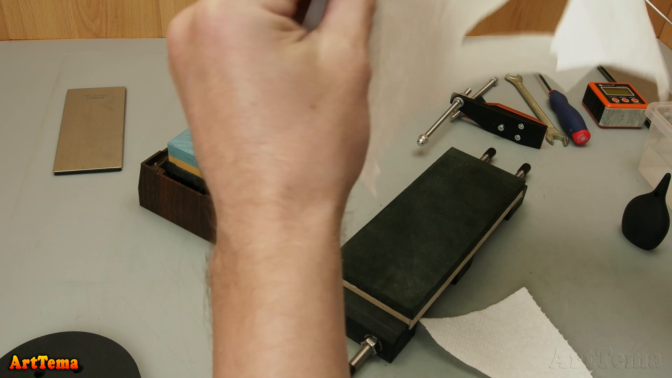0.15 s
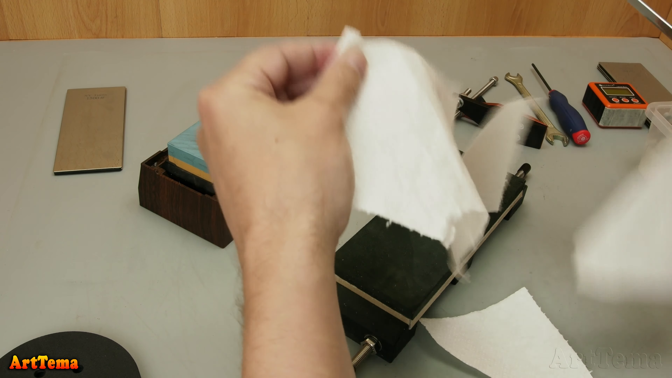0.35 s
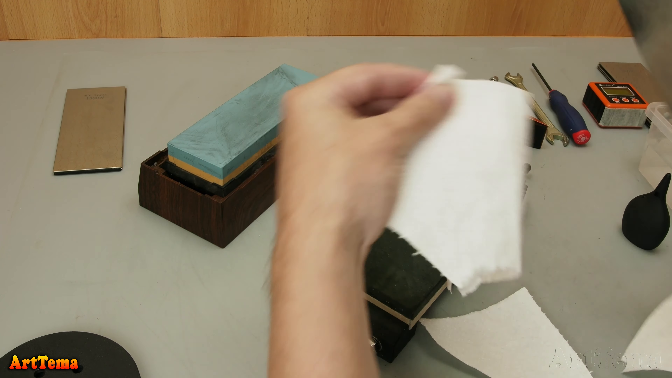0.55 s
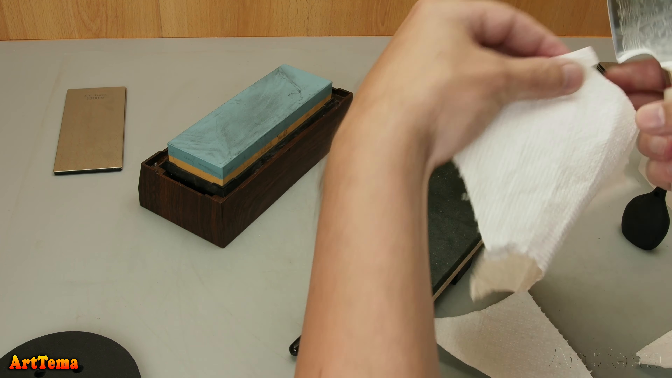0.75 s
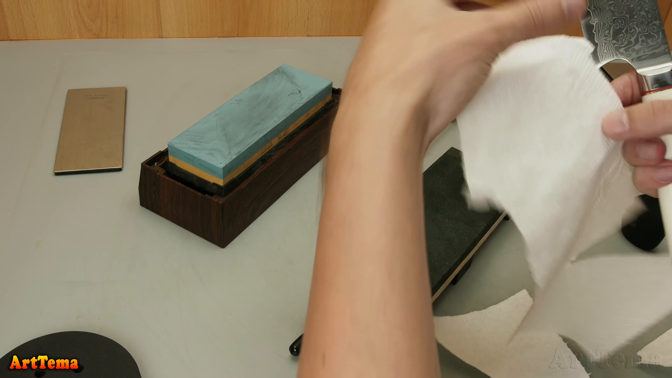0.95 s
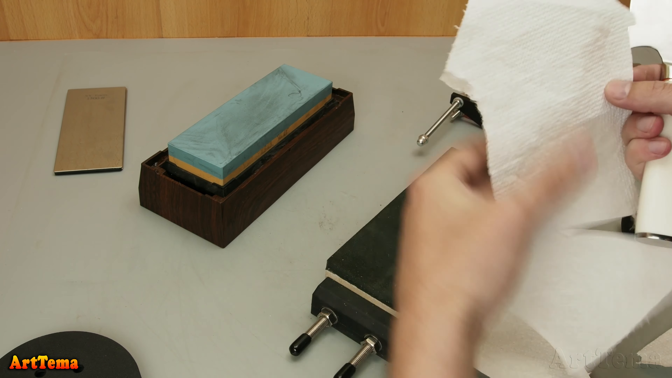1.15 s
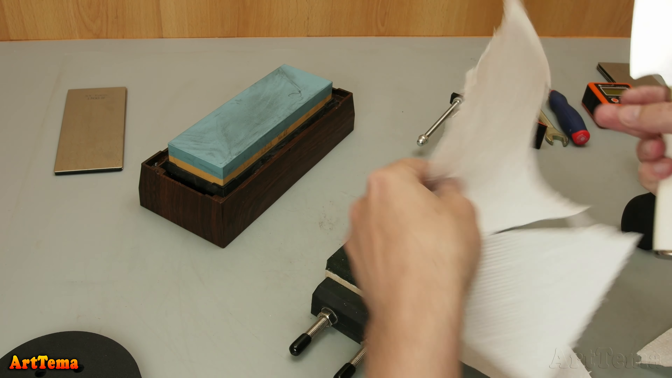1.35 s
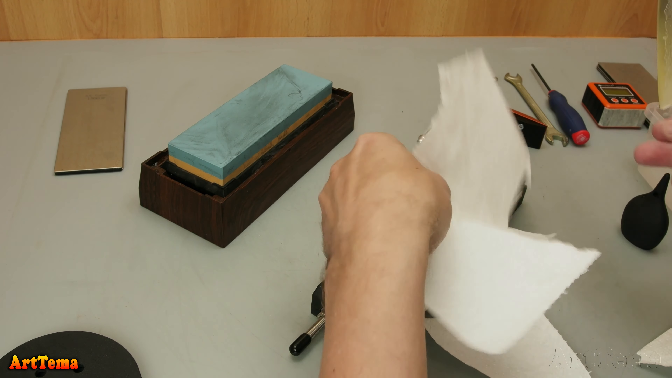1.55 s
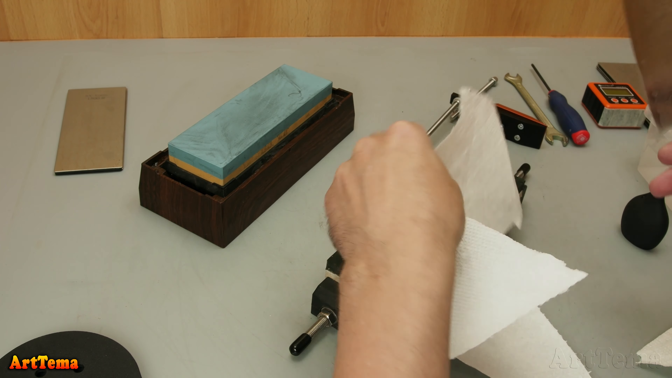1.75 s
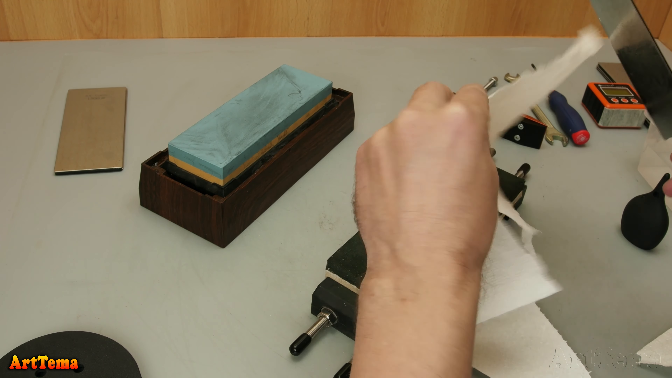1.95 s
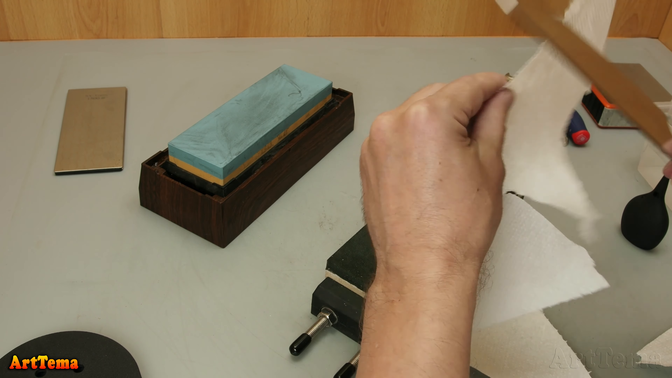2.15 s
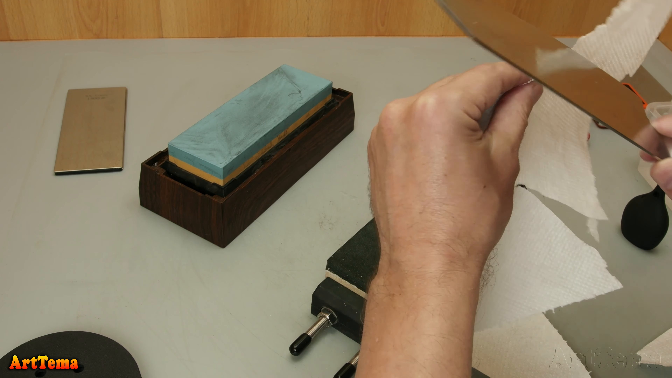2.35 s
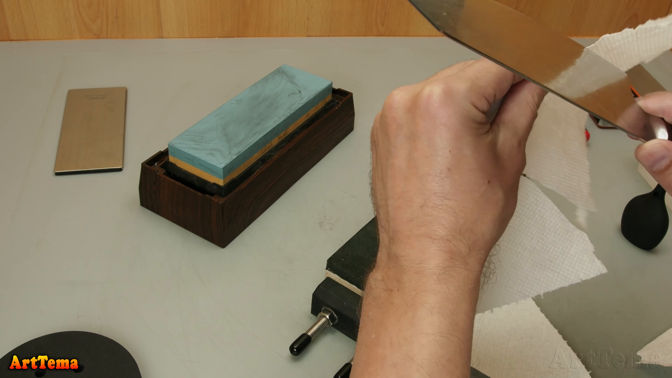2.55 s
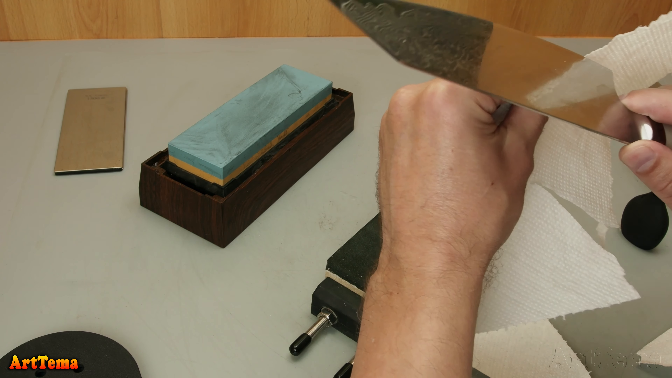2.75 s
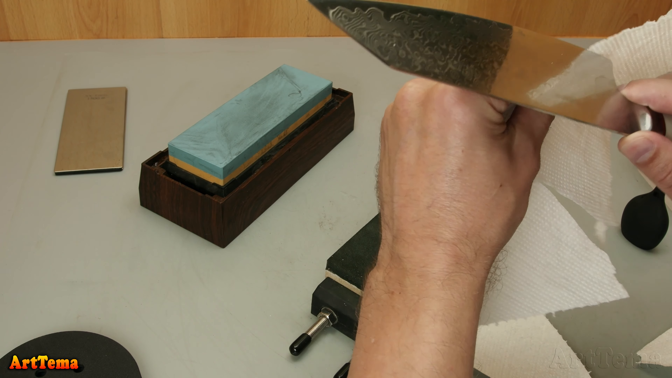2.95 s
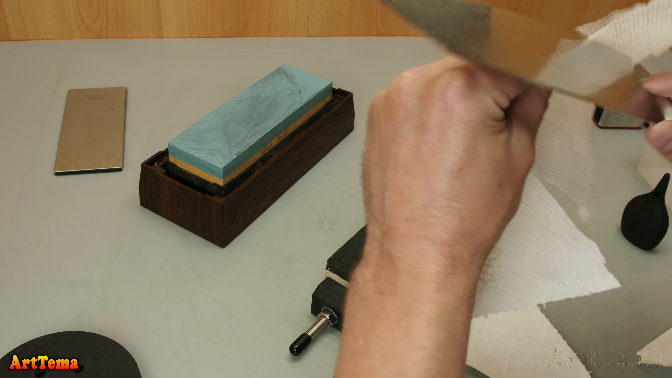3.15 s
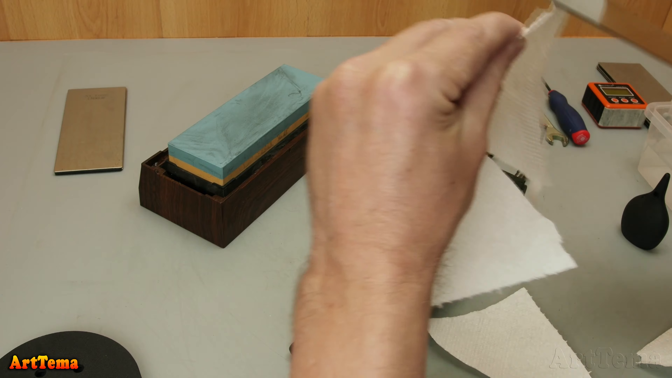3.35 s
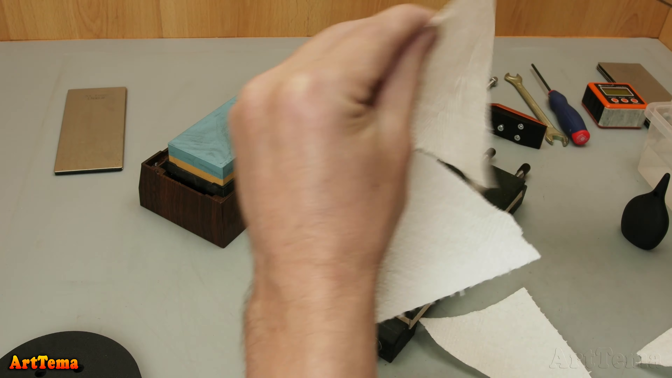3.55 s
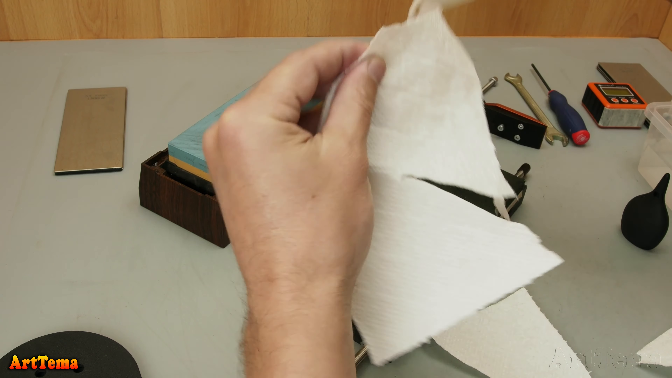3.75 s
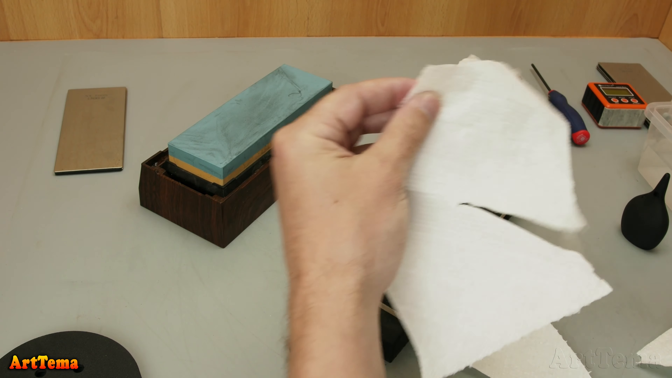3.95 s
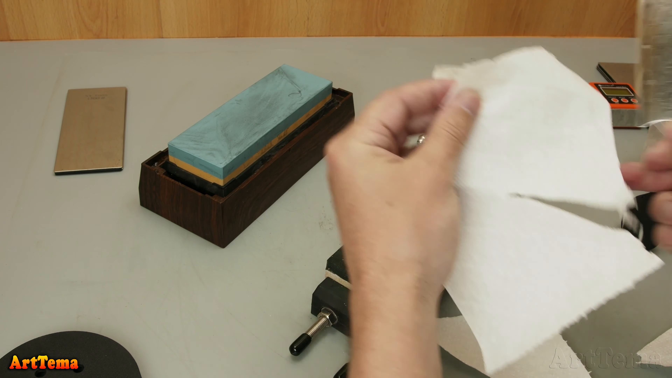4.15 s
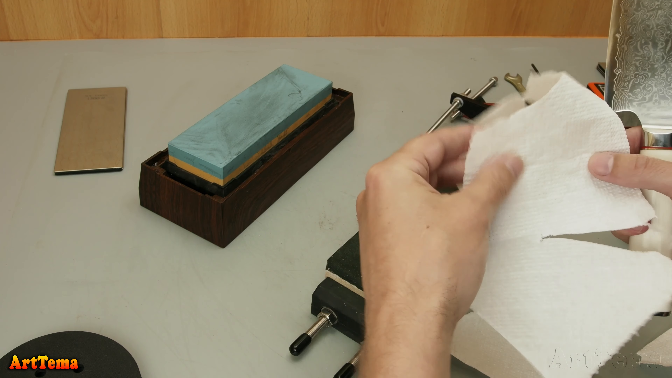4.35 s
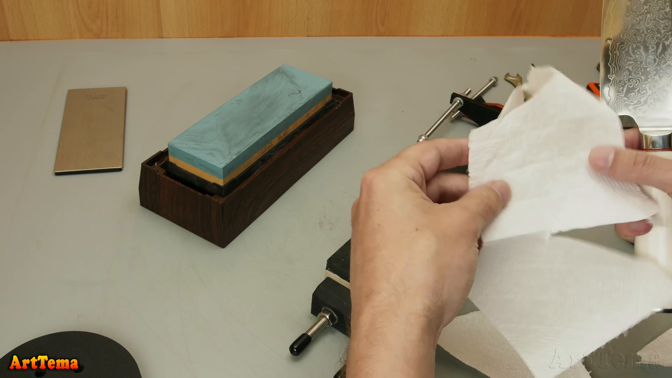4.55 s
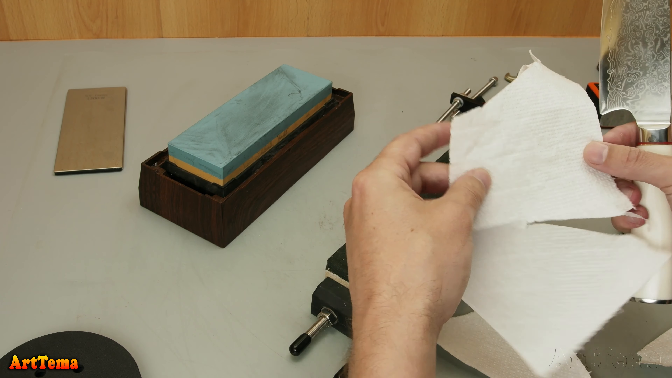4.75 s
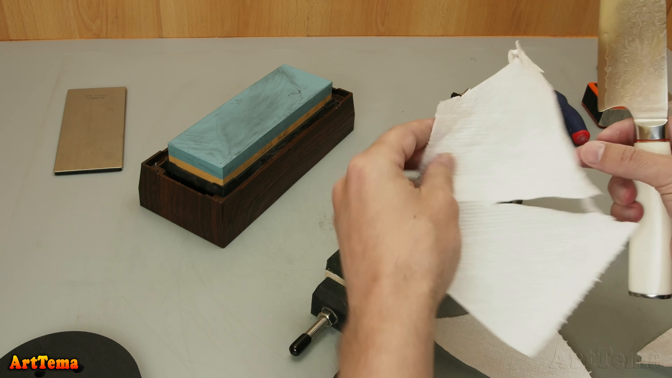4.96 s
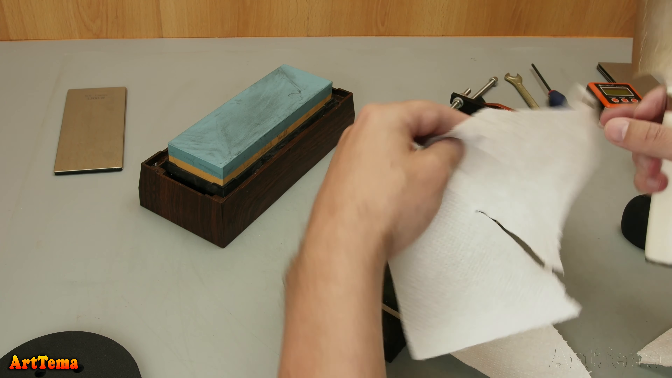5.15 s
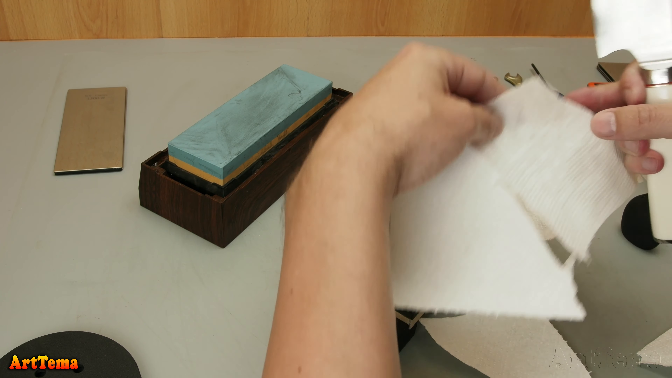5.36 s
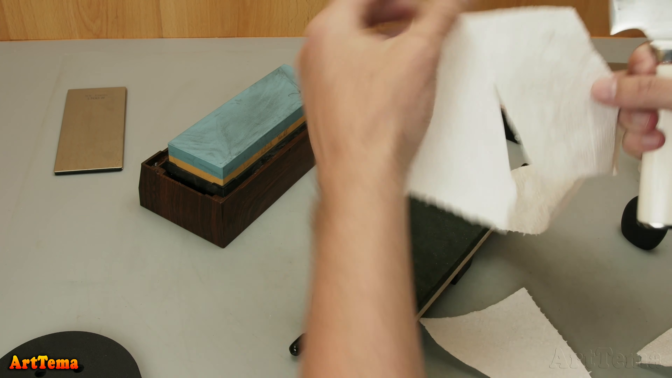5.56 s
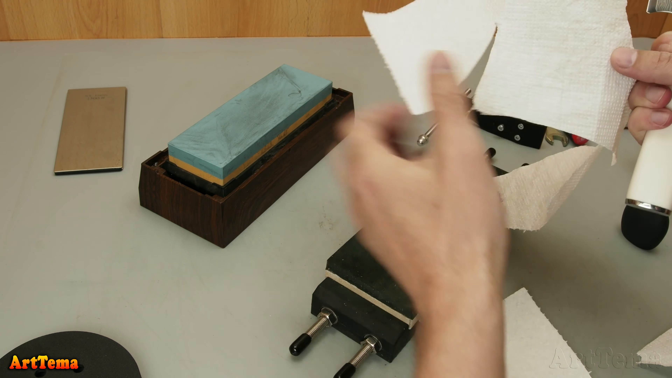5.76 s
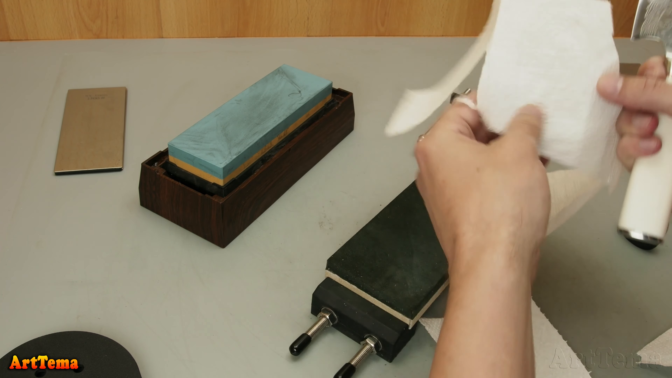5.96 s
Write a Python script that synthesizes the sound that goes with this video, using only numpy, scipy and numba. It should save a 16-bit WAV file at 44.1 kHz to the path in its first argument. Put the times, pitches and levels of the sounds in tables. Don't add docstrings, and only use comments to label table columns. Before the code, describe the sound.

A knife rips through a paper towel with a crisp tearing hiss, then light rustles and flicks, another swelling rip, and quiet handling.

```python
import sys
import numpy as np
from scipy import signal
from scipy.fft import rfft, irfft, next_fast_len
from scipy.io import wavfile
from numba import njit

SR = 44100
rng = np.random.default_rng(int(sys.argv[2]) if len(sys.argv) > 2 else 0)


def put_to_file(sound):
    columns = np.atleast_2d(sound).T
    safe = np.clip(columns, -1, 1)
    whole_steps = np.round(safe * 32767)
    wavfile.write(sys.argv[1], SR, whole_steps.astype(np.int16))


def boost(x):
    u = np.asarray(x, float) / 20
    return 10 ** u


N = 268569
STEP = 32

# hz [Hz], level_db [dB per Hz]
FIBRE_SPECTRUM = [(560, -39), (950, -1), (1150, -26.5), (1500, -7), (1590, -2), (1920, -6.5), (2130, -3.5),
                  (2750, -3), (2950, 1), (3100, -4), (5360, -5.5), (15600, -15.5)]
# hz [Hz], level_db [dB per Hz]
FLUTTER_SPECTRUM = [(26, -56), (45, -24), (97, -18.5), (284, -3), (330, -9), (446, -3), (571, -14),
                    (638, -9.5), (683, -11), (950, -23), (1200, -39), (1560, -57), (2640, -120)]
# hz [Hz], likeness [-1..1]
FLUTTER_ALIKE = [(40, .3), (110, .92), (250, .97), (1200, .93)]
# hz [Hz], likeness [-1..1]
PAPER_ALIKE = [(60, 0.085), (130, 0.84), (290, 0.95), (640, 0.9), (1410, 0.88), (3100, 0.71), (6820, -0.28),
               (15000, -0.14)]
# hz [Hz], left_minus_right_db [dB]
PAPER_BALANCE = [(60, -2), (180, -3), (550, -2.5), (1650, -3), (4970, -4), (15000, -2)]


def cut():
    fibre_db, glide_db, flutter_db = blade()
    snaps = sheet(grains(10000, spread_db=3.2, clump_db=1.6), t60=0.05, direct_db=6)

    def hiss_db(hz):
        hump = np.exp(-(np.log2(hz / 5400) / 0.62) ** 2)
        bright_follows_glide = 0.81
        tilt = (1 - hump) * bright_share(hz) * bright_follows_glide
        return fibre_db + 9.5 + at_hz(FIBRE_SPECTRUM, hz) + (tilt + hump) * glide_db

    def shake_db(hz):
        return flutter_db + 16.5 + at_hz(FLUTTER_SPECTRUM, hz)

    hiss = banded(snaps, 927, 18350, hiss_db, PAPER_ALIKE, PAPER_BALANCE, patchy_db=1.0)
    flutter = banded(snaps, 30, 1198, shake_db, FLUTTER_ALIKE, PAPER_BALANCE, patchy_db=1.0)
    return hiss + signal.sosfilt(signal.butter(2, 75, "high", fs=SR, output="sos"), flutter)


# start_s [s], pressure_db [dB], glide_db [dB], slack_db [dB]
CUTS = [
    [(0.0, -32, -4, 0), (0.046, -33, -6.5, -7), (0.09, -32.5, -2.5, 2.5), (0.12, -33.5, 2, 2.5),
     (0.172, -34.5, 1, 3)],
    [(3.07, -86, 11, -8.5), (3.14, -59, 7.5, -12), (3.2, -48.5, 7.5, -2.5), (3.3, -42, 2.5, -11),
     (3.335, -38.5, 1, -1), (3.38, -41.5, 0, -3), (3.478, -41, 4, 7.5), (3.575, -32.5, -4, -1),
     (3.634, -31.5, -0.5, 2.5)],
]


def blade():
    s, rows = control_time(), np.concatenate(CUTS)
    fibre, flutter = [], []
    for stroke in map(np.array, CUTS):
        start_s, end_s = stroke[:, 0], stroke[-1, 0]
        after = np.maximum(s - end_s, 0)
        dying_db = power_db([-600.0 * after, -17.0 - 169 * after])
        swaying_db = power_db([-279.5 * after, -16.5 - 88 * after])
        pressure_db = np.interp(s, start_s, stroke[:, 1], left=-140)
        fibre.append(pressure_db + dying_db)
        flutter.append(pressure_db + np.interp(s, start_s, stroke[:, 3]) + swaying_db)
    return power_db(fibre), np.interp(s, rows[:, 0], rows[:, 2]), power_db(flutter)


def grains(per_s, spread_db, clump_db):
    born = rng.random((4, N)) < per_s / SR
    sizes_db = spread_db * np.minimum(rng.exponential(1, (4, N)), 5)
    sizes = boost(sizes_db) * rng.choice([-1, 1], (4, N))
    clumps = full(boost(clump_db * drift(70)))
    return (rms_one(born * sizes) * clumps).reshape(2, 2, N)


def sheet(snaps, t60, direct_db):
    hop = 2048
    out, t = np.zeros(snaps.shape[:-1] + (N + 4 * hop,)), np.arange(hop) / SR
    padded = np.pad(snaps, [(0, 0), (0, 0), (hop, 2 * hop)])
    for i in range(0, N + hop, hop):
        noise = signal.lfilter([1], [1, -0.55], rng.standard_normal(hop))
        modes = rms_one(noise * boost(-60 * t / t60)) / np.sqrt(hop)
        modes[0] += boost(direct_db)
        piece = padded[..., i:i + 2 * hop] * np.hanning(2 * hop)
        out[..., i:i + 3 * hop] += irfft(rfft(piece, 3 * hop) * rfft(modes, 3 * hop), 3 * hop)
    return rms_one(out[..., hop:hop + N])


# hz [Hz], level_db [dB per Hz]
RUB_SPECTRUM = [(560, -41), (950, -17.5), (1160, -8.5), (1460, -9), (1850, 1), (2280, -8), (2820, 0),
                (4660, -3.5), (5180, -6), (15600, -19.5)]


def handling():
    rub_db, bright_db, crease_hz = fingers_on_sheet()
    snaps = sheet(grains(7000, spread_db=3.2, clump_db=1.2), t60=0.04, direct_db=5)

    def band_db(hz):
        return rub_db + 8.0 + at_hz(RUB_SPECTRUM, hz) + bright_share(hz) * (bright_db + 8.5)

    rub = banded(snaps, 939, 15220, band_db, PAPER_ALIKE, PAPER_BALANCE, patchy_db=1.0)
    crease = rms_one(moving_resonance(snaps[0, 0], full(crease_hz), 220.0, SR))
    crease_under_rub_db = -8.0
    return rub + crease * full(boost(rub_db + crease_under_rub_db)) * left_right(1.2)


# start_s [s], rub_db [dB], fade_s [s per 20 dB], bright_db [dB], crease_hz [Hz]
FLICKS = [
    (0.257, -55, 0.1846, -6, 2200),
    (0.613, -45, 0.0529, -15, 1820),
    (0.822, -60, 0.12, -13, 3130),
    (1.343, -64.5, 0.6, -1.5, 1850),
    (1.702, -64, 0.36, -3.5, 2370),
    (1.982, -63, 0.2, -9, 2800),
    (4.417, -65, .1, -9, 2830),
    (4.711, -53.5, 0.17, -8.5, 3000),
    (5.335, -72, 0.5, -5.5, 3300),
    (6.005, -71.5, -7, 3, 2850),
]
# middle_s [s], rub_db [dB], half_length_s [s], bright_db [dB], crease_hz [Hz]
SLIDES = [(0.37, -70, .12, -9, 2800), (0.608, -54.5, 0.019, -13.5, 1720), (1.063, -57.5, .055, -1, 2570),
          (1.155, -66.5, .04, -6, 2390), (1.245, -65.5, .075, -5.5, 3530), (1.416, -52, 0.052, -4, 2880),
          (1.56, -72.5, .25, -6, 2900), (1.65, -67.5, .07, -20, 3300), (1.83, -73, .2, -11, 2600),
          (1.898, -64.5, .06, 1, 2930), (2.13, -69.5, .2, -2, 2900), (3.685, -45.5, .04, -5.5, 2600),
          (3.77, -68.5, 0.16, -4, 2600), (3.864, -74, 0.098, -5, 2200), (4.471, -54.5, 0.063, -9, 3000),
          (4.522, -56.5, 0.091, -9, 2580), (4.692, -68, 0.065, -13, 2400), (4.796, -61.5, 0.072, -1, 2400),
          (5.02, -63.5, .075, -9, 2370), (5.168, -64.5, 0.097, -8.5, 3140), (5.244, -63, 0.096, -7.5, 3400),
          (5.62, -58, 0.074, -6, 2340), (5.692, -55, 0.049, -15.5, 2320), (6.09, -70, .12, -6, 2750)]


def fingers_on_sheet():
    s = control_time()
    rise_s = 0.009
    roundness = 1.36
    strokes = []
    for at, db, fade_s, *_ in FLICKS:
        strokes.append(db - 20 * np.maximum((at - s) / rise_s, (s - at) / fade_s))
    for at, db, half_s, *_ in SLIDES:
        strokes.append(db - 20 * np.abs((s - at) / half_s) ** roundness)
    power = boost(np.maximum(strokes, -140)) ** 2
    bright_db, crease_hz = np.array(FLICKS + SLIDES)[:, 3:].T @ power / power.sum(axis=0)
    return power_db(strokes), bright_db, crease_hz


@njit
def moving_resonance(x, hz, width_hz, sr):
    y, r = np.zeros(len(x)), np.exp(-np.pi * width_hz / sr)
    for i in range(2, len(x)):
        y[i] = x[i] - x[i - 2] + 2 * r * np.cos(2 * np.pi * hz[i] / sr) * y[i - 1] - r * r * y[i - 2]
    return y


# start_s [s], peak_db [dB], ring_hz [Hz], t60_s [s], crack_db [dB]
SNAPS = [(0.0494, -23, 2500, 0.049, -15), (0.1352, -32, 1750, 0.025, 11), (0.1694, -26, 3510, 0.0088, -0.5),
         (0.2603, -41.5, 2160, 0.026, -2), (0.3686, -51.5, 2860, 0.019, -7),
         (0.5366, -49.5, 1580, 0.014, -11), (0.613, -34.5, 1500, 0.015, -13), (0.817, -55, 3190, 0.022, -5),
         (1.154, -52.5, 2270, 0.025, -9), (1.3624, -45, 1780, 0.028, -18),
         (1.4186, -38.5, 2500, 0.011, -11), (1.7496, -54, 2370, 0.023, -2.5),
         (1.9983, -53, 3500, 0.032, -9), (3.3785, -25, 1760, 0.016, -4), (3.5781, -18, 2947, 0.034, -22),
         (3.6248, -18, 2074, 0.034, -17), (4.416, -52.5, 2050, 0.025, -11.5),
         (4.7105, -45, 1470, 0.022, -15.5), (4.7965, -49, 2220, 0.028, -15), (5.3303, -57, 4210, 0.029, 2),
         (5.356, -58, 3640, 0.025, 3), (5.6322, -45.5, 2300, 0.028, -5), (5.686, -45, 2350, 0.057, -10),
         (6.001, -59.5, 3810, 0.023, 4)]
# start_s [s], peak_db [dB], boom_hz [Hz], t60_s [s]
FLAPS = [(0.547, -43, 366, 0.016), (0.613, -42, 407, 0.013), (1.054, -40.5, 463, 0.03),
         (1.378, -39.5, 200, 0.021), (1.395, -34, 213, 0.051), (1.419, -48, 263, 0.11),
         (3.259, -39.5, 520, 0.04), (3.326, -33.5, 420, 0.06), (3.461, -24, 430, 0.04),
         (3.597, -26, 440, 0.05), (3.619, -23, 458, 0.091), (3.686, -32, 277, 0.09),
         (4.412, -48, 480, 0.018), (4.711, -40, 423, 0.019), (0.002, -27, 191, 0.1),
         (4.928, -52.5, 350, 0.061), (5.229, -51, 274, 0.069), (5.656, -49, 433, 0.043)]
# start_s [s], peak_db [dB], pitch_hz [Hz], t60_s [s]
PATS = [(0.199, -42, 730, 0.05), (0.61, -52, 496, 0.038), (1.795, -54.5, 605, 0.05),
        (1.829, -65, 627, 0.05), (1.899, -54.5, 787, 0.067), (1.939, -58, 623, 0.067),
        (4.441, -58, 533, 0.055), (4.479, -57, 575, 0.05), (4.728, -50, 655, 0.05),
        (4.991, -56.5, 515, 0.045), (5.592, -54, 886, 0.069)]


def folds():
    snaps = knocks(SNAPS, push_s=0.0059, rise_s=0.0003)
    return snaps + knocks(FLAPS + PATS, push_s=0.013, rise_s=0.00067)


def knocks(events, push_s, rise_s):
    out, t = np.zeros(N + SR), np.arange(SR // 4) / SR
    for s, peak_db, hz, t60, *crack_db in events:
        noise = rng.standard_normal((2, len(t)))
        push = noise[0] * np.exp(-t / push_s) * (1 - np.exp(-t / rise_s))
        body = ring(push, hz, max(t60, 0.005))
        crack = boost(crack_db or [-30]) * noise[1] * np.exp(-t / 0.004)
        out[round(s * SR):][:len(t)] += boost(peak_db - 2.5) * (body / np.abs(body).max() + crack)
    return signal.sosfilt(signal.butter(2, [130, 9000], "band", fs=SR, output="sos"), out[:N])


def table_dip(x, hz, width_hz, share):
    band = signal.butter(1, [hz - width_hz / 2, hz + width_hz / 2], "band", fs=SR, output="sos")
    return x - np.clip(share, 0, 1) * signal.sosfilt(band, x)


def room(x):
    t60_s, wall_cut_hz = 0.23, 5200
    size = next_fast_len(N + SR)
    hz = np.arange(size // 2 + 1) * SR / size
    dull, out = 1 / (1 + 1j * hz / wall_cut_hz), np.zeros((2, len(hz)), complex)
    for k, lag in enumerate(rng.uniform(0.011, 0.03, 16)):
        loop = boost(-60 * lag / t60_s) * dull * np.exp(-2j * np.pi * hz * lag)
        out[k % 2] += loop / (1 - loop) * (-1) ** (k // 2)
    thin = (1j * hz / (700 + 1j * hz)) ** 2
    return irfft(out * thin * rfft(x, size), size)[:, :N]


# first_s [s], last_s [s], peak_db [dB]
MOTOR_RUNS = [(0.2535, 0.73, -59), (0.8207, 0.96, -61), (0.9876, 1.4, -58), (1.5882, 2.0, -60),
              (2.0887, 2.36, -57.5), (2.4891, 2.76, -58), (2.9229, 3.2, -58), (4.0240, 4.36, -57),
              (4.5245, 5.13, -58.5), (5.2586, 5.87, -59), (5.9926, 6.07, -58)]
# pitch_hz [Hz], level_db [dB], t60_s [s]
HOUSING_MODES = [(380, -4, 0.013), (623, -4.5, 0.051), (850, -5, 0.02), (1120, -13, 0.015),
                 (1340, -9.5, 0.012)]


def lens_motor():
    period_s, spread_db = 2 * 1001 / 30000, 2.0
    steps = [(s, db) for first, last, db in MOTOR_RUNS for s in np.arange(first, last, period_s)]
    start_s, peak_db = np.array(steps).T
    at, out = np.round(start_s * SR).astype(int), np.zeros((2, N))
    strength_db = peak_db + spread_db * rng.standard_normal(len(at))
    for hz, level_db, t60 in HOUSING_MODES:
        clicks = np.zeros((2, N + SR))
        for late_s, weaker_db in [(0, 0), (0.0015, -3), (0.0055, -5)]:
            chance_db, sign = rng.standard_normal((2, len(at))), rng.choice([-1, 1])
            clicks[:, at + round(late_s * SR)] = sign * boost(strength_db + level_db + weaker_db + chance_db)
        out += ring(clicks[:, :N], hz, t60)
    soft = signal.butter(2, 1600, fs=SR, output="sos")
    return signal.sosfilt(soft, out) * left_right(1.2)


# hz [Hz], level_db [dB per Hz]
TONE_SPECTRUM = [(13, -42), (22, -15), (92, -1.5), (127, -3), (172, -0.5), (221, -2), (267, -4.5),
                 (382, -5), (546, -13.5), (644, -11.5), (1150, -31.5), (1830, -23), (4400, -27.5),
                 (13900, -38.5), (15600, -33)]
# hz [Hz], likeness [-1..1]
TONE_ALIKE = [(60, 0.37), (240, 0.44), (950, 0.21), (3770, 0.05), (15000, -0.19)]
# hz [Hz], left_minus_right_db [dB]
TONE_BALANCE = [(60, 0), (240, -2), (950, -2), (3770, -1.5), (15000, -0.5)]


def room_tone():
    noise = rng.standard_normal((2, 2, N))
    tone = banded(noise, 22.96, 15920, lambda hz: at_hz(TONE_SPECTRUM, hz),
                  TONE_ALIKE, TONE_BALANCE, patchy_db=3.0)
    return boost(-60.5) * rms_one(tone)


def banded(source, low_hz, high_hz, gain_db, alike, balance, patchy_db):
    edges = np.geomspace(low_hz, high_hz, int(3 * np.log2(high_hz / low_hz)) + 2)
    out, neighbour = 0, drift(6.3)
    for k, (low, high) in enumerate(zip(edges, edges[1:])):
        band = signal.butter(2, [low, high], "band", fs=SR, output="sos")
        mid, side = signal.sosfilt(band, source[k % 2])
        hz, own = np.sqrt(low * high), drift(17.4)
        likeness = np.clip(at_hz(alike, hz), 0, 0.99)
        gain = full(boost(gain_db(hz) + patchy_db * (0.27 * neighbour + 0.6 * own)))
        stereo = np.sqrt(1 + likeness) * mid + np.sqrt(1 - likeness) * side * [[1], [-1]]
        out = out + gain * stereo * left_right(at_hz(balance, hz) / 2)
        neighbour = own
    return out


def bright_share(hz):
    return np.clip(np.log(hz / 3500) / np.log(9000 / 3500), 0, 1.1)


def ring(clicks, hz, t60):
    r, w = boost(-60 / (t60 * SR)), 2 * np.pi * hz / SR
    return signal.lfilter([0, np.sin(w)], [1, -2 * r * np.cos(w), r * r], clicks + 1e-18)


def drift(rate):
    r = np.exp(-2 * np.pi * STEP * rate / SR)
    noise = rng.standard_normal(N // STEP + 2002)
    return rms_one(signal.lfilter([1], [1, -2 * r, r * r], noise)[2000:])


def left_right(db):
    return boost(np.array([[db], [-db]]))


def at_hz(points, hz):
    table = np.array(points)
    return np.interp(np.log(hz), np.log(np.maximum(table[:, 0], 1)), table[:, 1])


def power_db(levels_db):
    return 10 * np.log10(np.sum(boost(np.asarray(levels_db)) ** 2, axis=0) + 1e-14)


def rms_one(x):
    return x / np.sqrt(np.mean(x ** 2) + 1e-20)


def control_time():
    return np.arange(N // STEP + 2) * STEP / SR


def full(slow):
    return np.interp(np.arange(N) / STEP, np.arange(len(slow)), slow)


def scene():
    fingers = handling() + folds() * left_right(1.3)
    paper = cut() + table_dip(fingers, hz=1140, width_hz=380, share=0.59)
    echo = boost(-15) * room(paper.mean(axis=0))
    return paper + echo + lens_motor() + room_tone()


def band_limit(x):
    return signal.sosfilt(signal.butter(12, 15700, fs=SR, output="sos"), x)


def record(dry):
    return band_limit(dry)


dry = scene()
out = record(dry)
put_to_file(out)
```